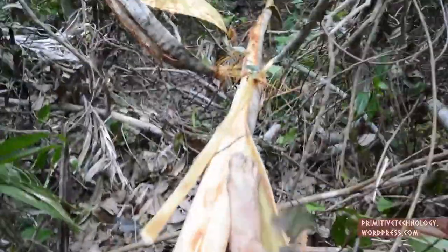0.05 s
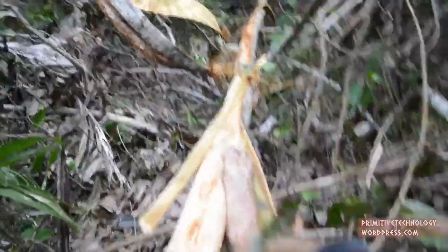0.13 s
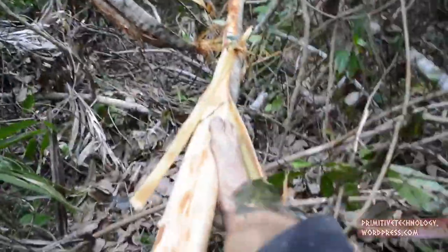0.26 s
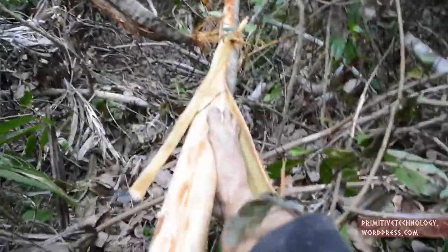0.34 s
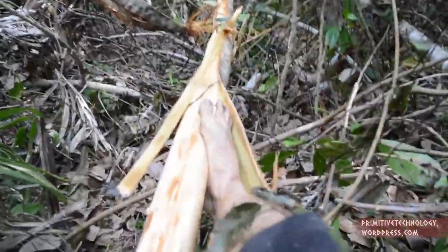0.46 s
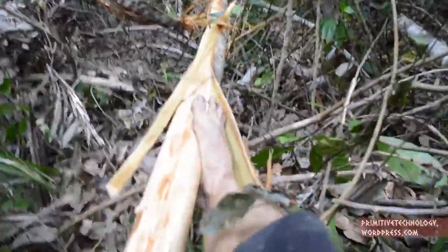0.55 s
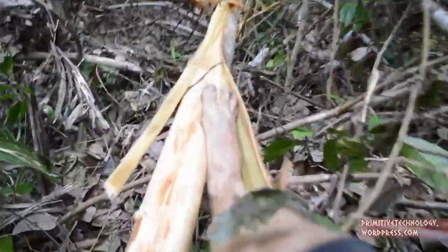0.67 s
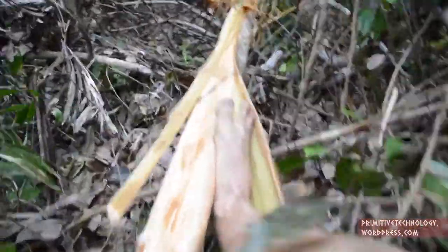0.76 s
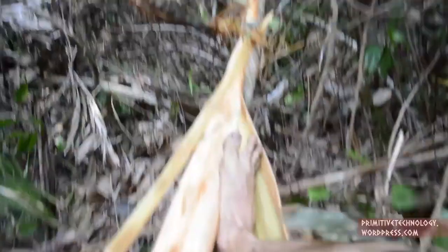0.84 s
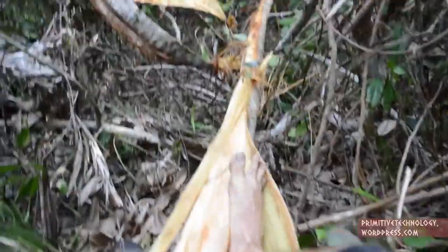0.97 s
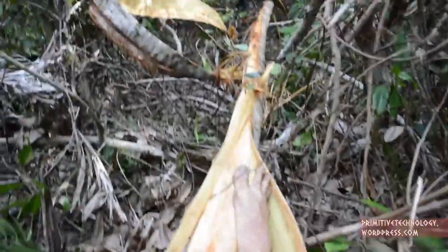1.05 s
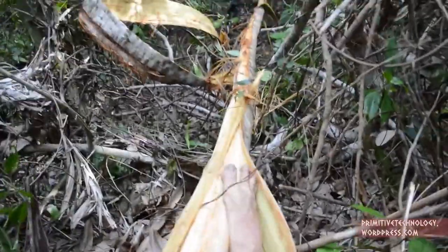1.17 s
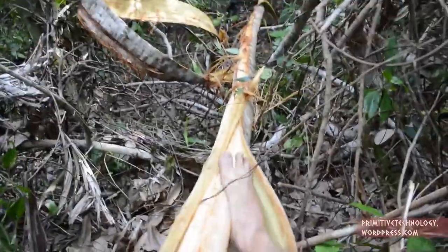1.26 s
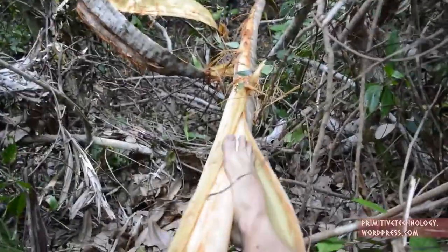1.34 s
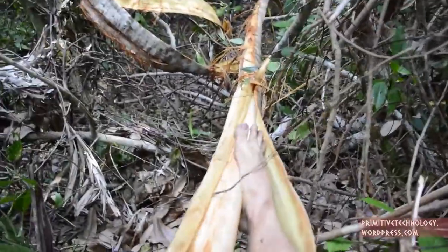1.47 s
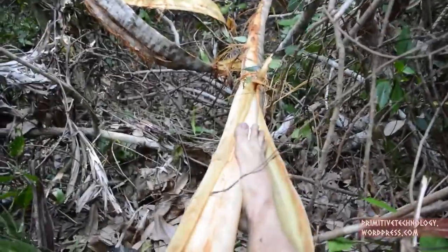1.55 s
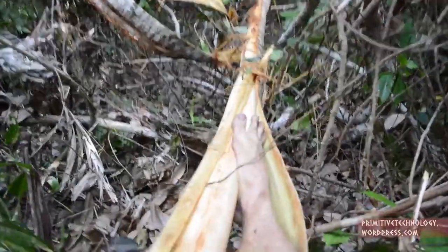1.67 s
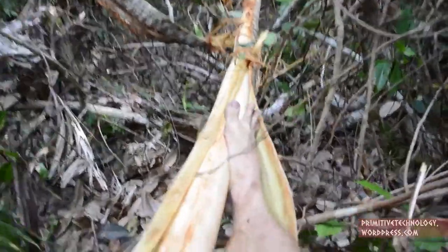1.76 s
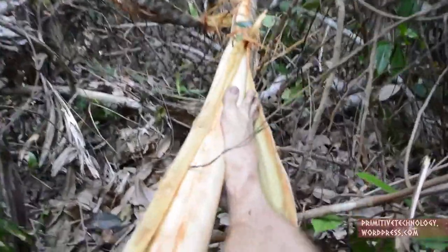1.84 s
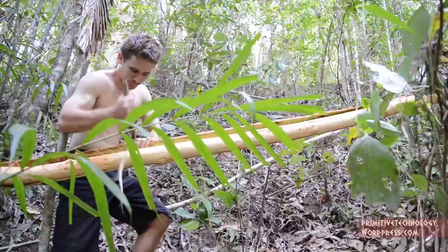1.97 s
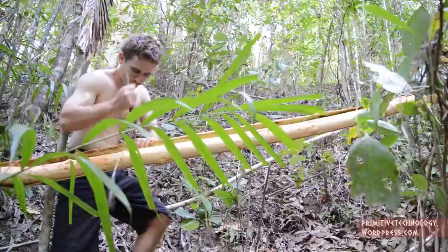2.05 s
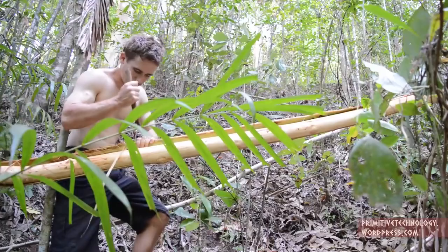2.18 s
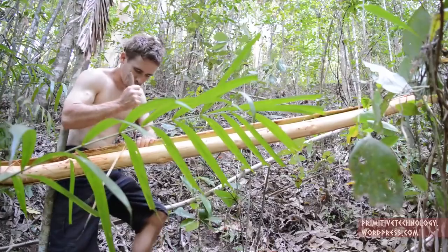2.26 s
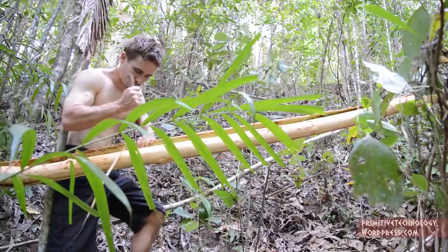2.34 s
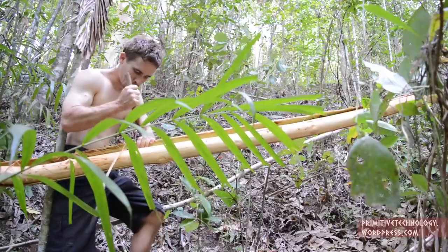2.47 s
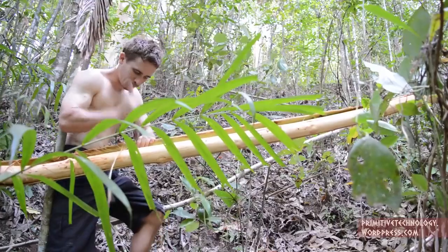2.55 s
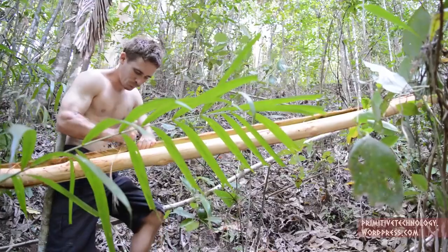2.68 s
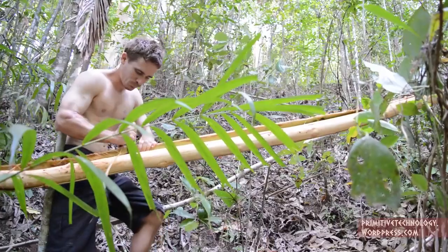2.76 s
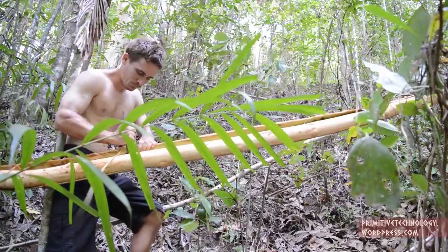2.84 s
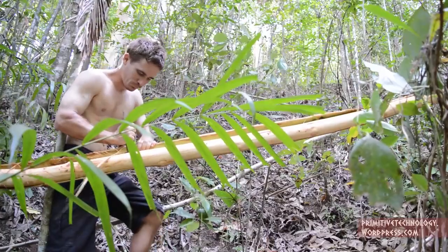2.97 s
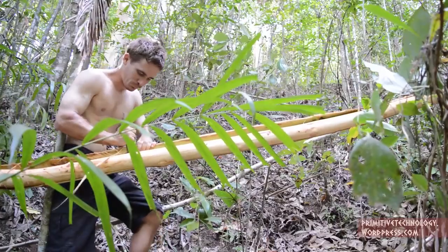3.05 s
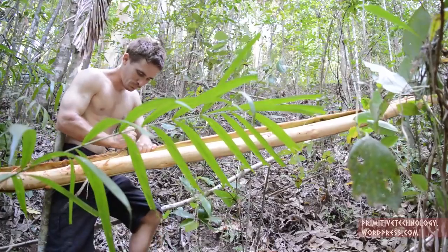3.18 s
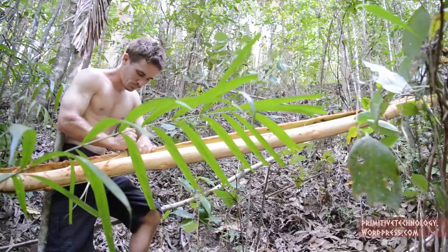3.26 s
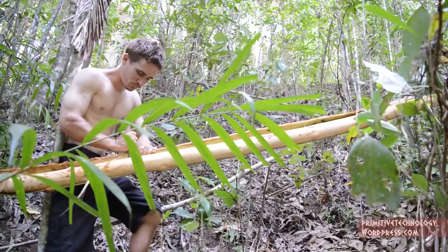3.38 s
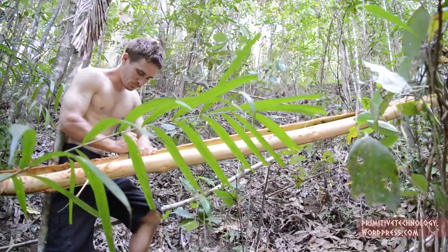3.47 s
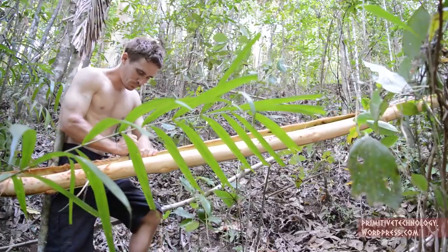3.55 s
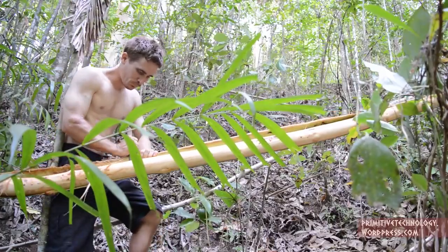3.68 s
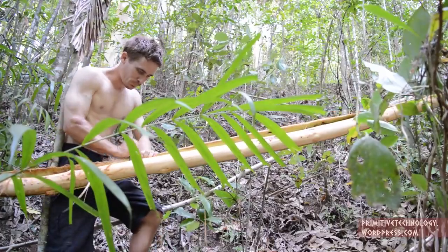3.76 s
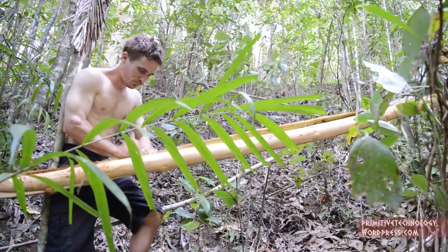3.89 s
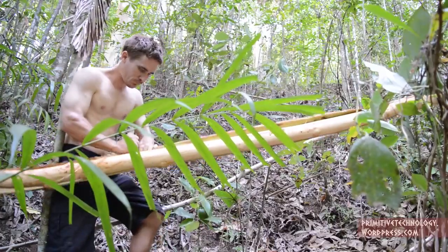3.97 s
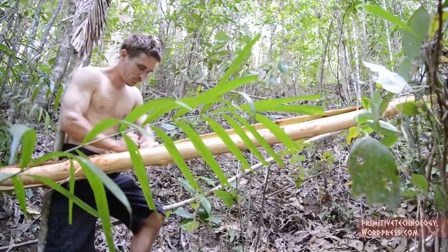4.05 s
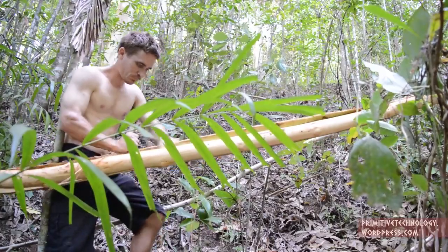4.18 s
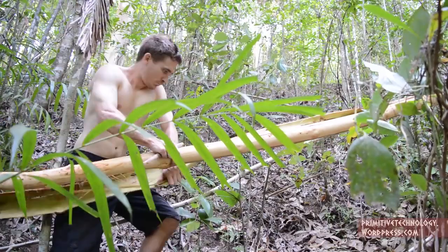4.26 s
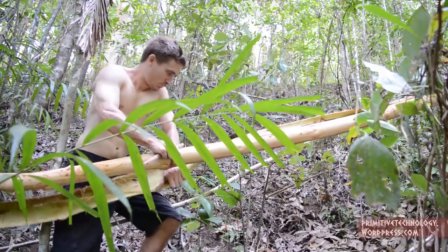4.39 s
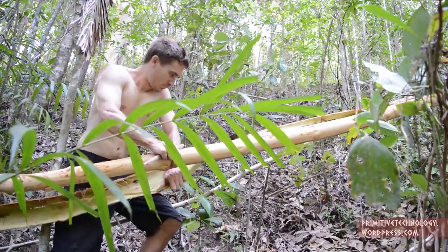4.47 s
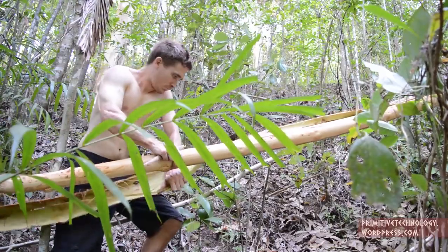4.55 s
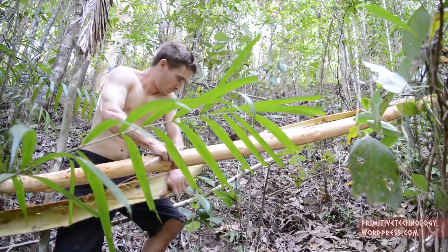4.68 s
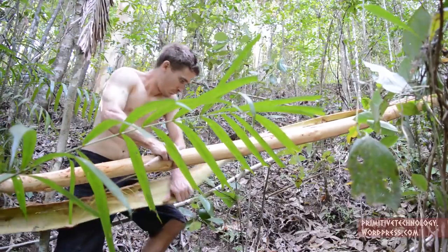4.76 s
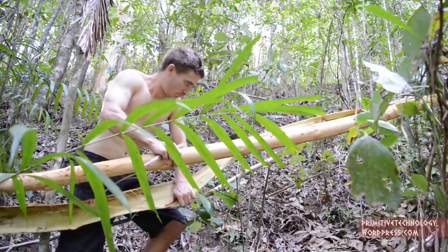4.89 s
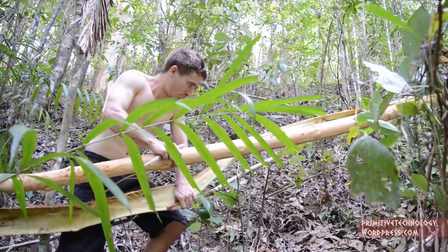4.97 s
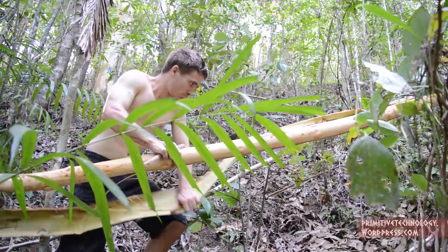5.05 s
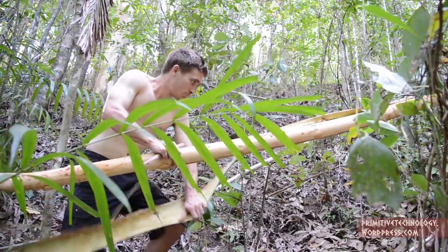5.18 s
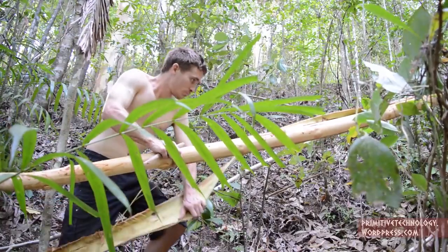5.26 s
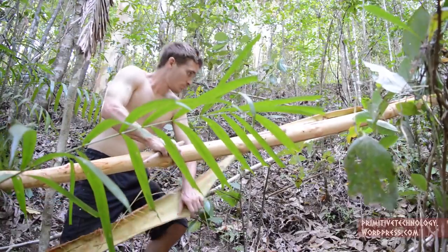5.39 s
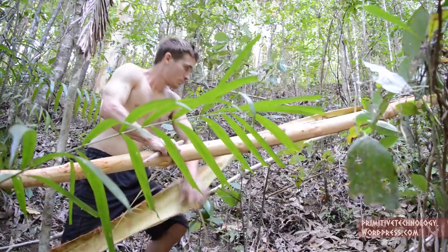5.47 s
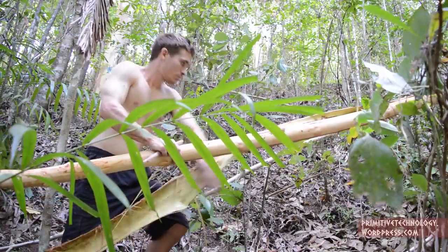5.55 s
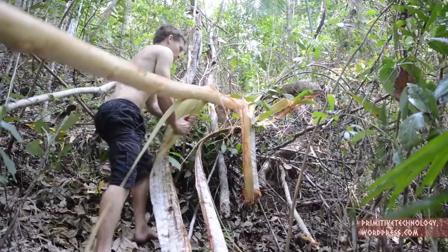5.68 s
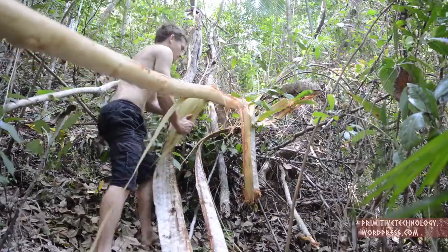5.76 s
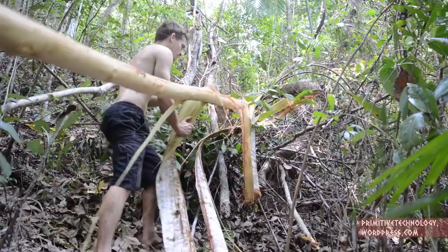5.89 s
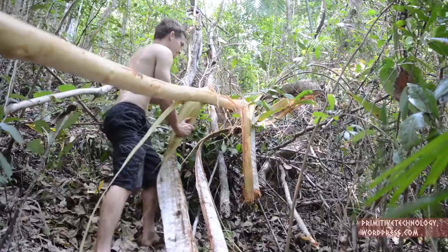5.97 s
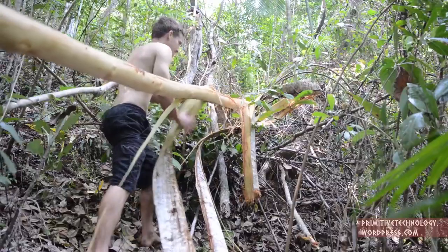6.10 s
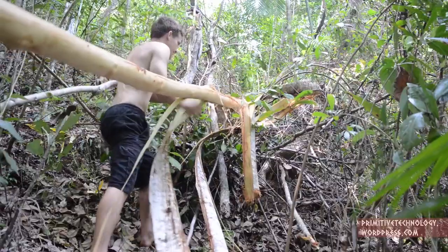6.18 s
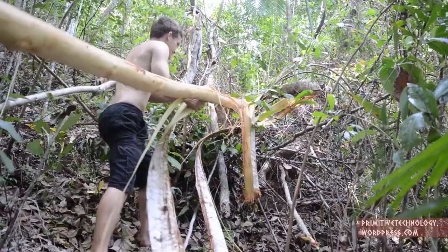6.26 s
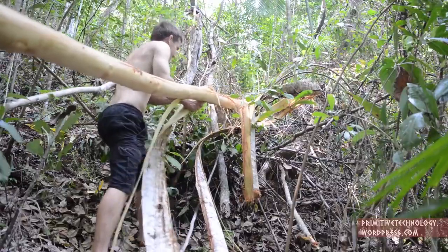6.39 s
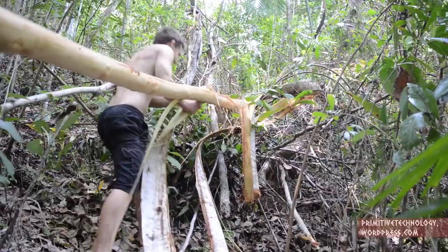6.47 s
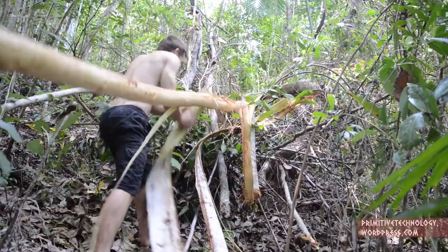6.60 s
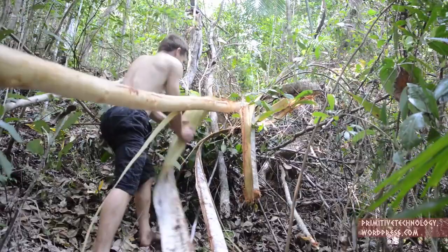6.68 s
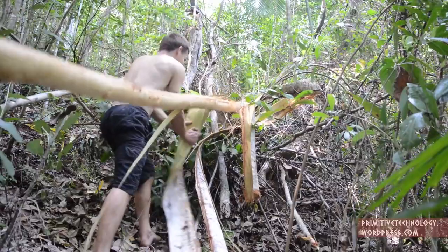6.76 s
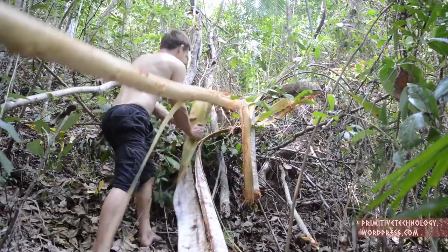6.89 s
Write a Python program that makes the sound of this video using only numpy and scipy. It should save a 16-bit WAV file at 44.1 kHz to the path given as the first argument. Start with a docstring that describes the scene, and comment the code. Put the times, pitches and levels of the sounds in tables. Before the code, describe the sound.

Fibrous bark is ripped off a trunk in crunchy, snapping bursts, loud and close first, then sparser picks, cracks and tearing pulls amid insect buzz.

```python
"""Fibrous bark is stripped from a fallen trunk in a forest. First it is levered off with a foot, then picked
and cracked loose by hand, then pulled away in a sheet, and at last ripped once more. All along, thousands of
random fibre breaks hiss and ring the bark sheet, and short bursts of breaks make snaps. Stiff bark cracks in the
first two stages, rings the trunk and overloads the microphone. Trees give a short echo over a faint wash of air;
filtered noise makes insects buzz, briefly near the start and then from the second stage to the end."""
import sys
import numpy as np
from scipy import signal
from scipy.fft import rfft, irfft
from scipy.io import wavfile
from scipy.ndimage import uniform_filter1d, map_coordinates

SR = 44100
rng = np.random.default_rng(int(sys.argv[2]) if len(sys.argv) > 2 else 0)


def file_out(sig):
    """Save sig as 16-bit WAV at sys.argv[1]."""
    # one column per channel
    cols = np.atleast_2d(sig).T
    # limit, then scale
    lim = np.clip(cols, -1, 1)
    pcm = np.round(lim * 32767).astype(np.int16)
    wavfile.write(sys.argv[1], SR, pcm)


N = 305613
TIME = np.arange(N) / SR  # seconds

# The four stages of the work: (start [s], end [s])
PEEL_S, PICK_S, PULL_S, RIP_S = (0, 2.075), (2.075, 4.31), (4.31, 5.735), (5.735, 7)

# Tone colour of the bark in each stage: (frequency [Hz], relative level [dB])
PEEL_COLOUR = [(47, -42), (80, -31), (182, -15.5), (441, -7), (672, -10.5), (917, -7), (1050, -9),
               (1670, -6), (2270, -7), (3620, -2.5), (9400, 5), (10500, 2), (16000, -21)]
PICK_COLOUR = [(150, -37), (600, -18.5), (900, -9), (1250, 0.5), (1800, -5), (2400, -3), (3200, -4.5),
               (5500, -2.5), (7500, -2), (10500, 3), (13000, -7.5), (16000, -24)]
PULL_COLOUR = [(100, -30), (300, -11), (780, -4), (1400, -5), (1800, -3), (2150, -8.5), (3300, -5.5),
               (6000, -5), (9600, -2.5), (11000, -3), (13000, -12.5), (16000, -26)]
RIP_COLOUR = [(88, -66), (150, -34), (376, -24), (439, -14.5), (702, -12.5), (923, -7.5), (998, -6.5),
              (1260, -6.5), (4490, -6), (9820, 2.5), (11900, -4), (16000, -24)]

# Tugs on the bark: (full force at [s], hold [s], build-up [s], dying away [s],
# fibre hiss before the stage's own gain [dB], sheet ring relative to the hiss, before that gain [dB])
TUGS = [(0, 0.0032, .01, 0.021, -14.5, -10), (0.054, 0.021, 0.045, 0.07, -30, -7),
        (0.461, 0.018, 0.059, 0.063, -30.5, -3.5), (0.569, 0.11, 0.063, 0.074, -24, -5),
        (0.798, 0.096, 0.06, 0.052, -28.5, -10.5), (0.964, 0.027, 0.058, 0.086, -15, -10.5),
        (1.18, 0.066, 0.05, .05, -24, -6), (1.349, .09, 0.052, 0.069, -19.5, -8),
        (1.525, .01, .03, .03, -34, -8), (1.644, 0.097, 0.12, 0.037, -26, -4.5),
        (1.853, 0.036, 0.11, .11, -27.5, -3), (2.069, 0.017, 0.065, 0.16, -31.5, 1),
        (2.106, .04, 0.088, 0.21, -37, -10.5), (2.723, 0.0095, 0.015, .013, -28, -20),
        (2.891, 0.011, 0.036, 0.023, -35.5, -6), (3, 0.13, 0.017, 0.18, -37, -10),
        (3.355, 0.0043, 0.016, .015, -31.5, -3.5), (3.394, 0.031, 0.014, 0.041, -30.5, -8),
        (3.593, 0.015, 0.035, 0.045, -35, -6.5), (3.682, 0.039, 0.049, 0.031, -32.5, -9),
        (3.865, 0.018, 0.023, 0.034, -17.5, -1), (4.345, .02, 0.011, .06, -38, -24),
        (4.45, 0.069, .025, .05, -34, -11.5), (4.612, 0.0082, .02, 0.018, -30, -20),
        (4.69, 0.088, 0.014, 0.045, -22.5, -21), (4.795, 0.03, 0.05, 0.057, -15.5, -12.5),
        (4.872, 0.013, .02, 0.013, -25.5, -13), (5.173, 0.016, 0.084, 0.052, -37, -8.5),
        (5.225, 0.065, 0.028, 0.041, -38.5, 3), (5.52, 0.046, 0.047, 0.09, -45, -3.5),
        (5.79, 0.065, .08, 0.21, -32.5, -8.5), (6.209, 0.25, .08, 0.049, -39, -6),
        (6.559, .02, .012, .02, -25, -9), (6.669, .1, 0.054, 0.026, -12, -7.5),
        (6.84, 0.034, .05, .15, -31, -5)]
TUG_SHAPE = 1.21  # 1 = exponential flanks, 2 = bell-shaped

# Large fibre bundles snapping: (time [s], level before the stage's own gain [dB], decay [s],
# sheet ring relative to the snap [dB], pitch of the freed splinter [Hz])
SNAPS = [(.0922, -17.5, 0.0047, -31, 9800), (.2108, -15.5, 0.0011, 1, 3970), (0.2483, -9, .0006, -10, 4000),
         (0.3017, -4.5, 0.00071, -9, 3830), (0.8205, -1, 0.00052, -16, 9900),
         (0.827, -16, 0.0022, 0.5, 5660), (0.845, -14, .004, -24, 7050), (.869, -13.5, 0.0044, -12, 9000),
         (.8985, -6, .0006, -23, 8950), (.955, -5, .0008, -26, 9000), (.962, -9, 0.0034, -20, 6000),
         (0.9822, -6.5, 0.0023, -17, 5600), (1.0274, -8, .00085, -9, 8000), (0.9949, -3, 0.00099, -3, 9300),
         (1.0692, -12, 0.0028, -6, 5300), (1.1305, -1, 0.00053, -12, 10100),
         (1.2178, -11.5, 0.0032, -6.5, 1680), (1.2426, -6.5, 0.00048, -23, 9200),
         (1.4343, -6, .0006, -21, 8100), (1.522, -12, 0.001, -9, 4200), (1.3952, 0, 0.0016, -7, 5550),
         (1.4145, -7, 0.0016, -12, 7700), (1.444, -8, 0.0042, -9, 7050), (1.5599, -5, 0.0013, -8, 7400),
         (1.5834, -13.5, 0.002, -15, 7300), (1.8875, -18.5, .004, -4, 4960), (1.966, -9, 0.0012, -10, 7500),
         (2.068, -22, 0.0027, -2, 9200), (2.114, -20, 0.00069, -22, 9300),
         (2.3178, -24.5, 0.00072, -18.5, 9800), (2.8911, -24, 0.0065, -8.5, 2240),
         (3.0018, -22, 0.0054, -2, 7300), (3.084, -25, .0016, -4.5, 2650), (3.105, -19, .0011, 0.5, 3620),
         (3.1324, -24, .0023, -3, 5550), (3.1607, -24.5, 0.0044, -6, 8250),
         (3.205, -23.5, 0.0015, -6, 2620), (3.2313, -28, .0006, -2, 2600),
         (3.252, -22.5, .0011, -6.5, 6800), (3.286, -25, 0.0046, -4.5, 8160),
         (3.343, -23, 0.0015, -2, 3170), (3.3947, -26, 0.0042, -3, 2600), (3.6747, -22.5, .003, -.5, 10100),
         (3.725, -27.5, 0.0032, -7.5, 2040), (3.9214, -18.5, 0.0022, -4, 3320),
         (3.9625, -22.5, .0014, -1, 6800), (4.328, -14, 0.0037, -19.5, 11100),
         (4.3653, -18, 0.0054, -19, 10200), (4.466, -21, 0.0036, -15, 8200),
         (4.5, -20.5, 0.0074, -17, 8000), (4.536, -14.5, 0.0055, -20, 4700), (4.68, -20.5, .007, -17, 3400),
         (4.7806, -13, 0.0073, -9, 4140), (4.798, -12, 0.0026, -3, 8700), (5.145, -23.5, 0.0025, -14, 8300),
         (5.2033, -15, 0.00068, -17, 9200), (5.2498, -19.5, 0.0029, -2, 2040),
         (5.409, -28, 0.0053, -29, 10200), (6.3266, -17, 0.00057, -13, 8900),
         (6.5154, -26, 0.0031, -2.5, 2430), (6.534, -21, .0033, -24, 10700), (6.7844, -11, 0.001, -7, 8650)]

# Small snaps: level is relative to the hiss of the moment, before the stage's own snap gain
SMALL_SNAPS_PER_S, SMALL_SNAP_DB, SMALL_SNAP_SPREAD_DB = 45, 3, 2.5
SMALL_SNAP_DECAY_S, SMALL_SNAP_HZ = 0.0012, 6000  # typical; each is within an octave of these

# Stiff bark cracking through: (time [s], level before the overall crack gain [dB], decay [s],
# blow to the trunk relative to the crack, before the trunk gain [dB])
CRACKS = [(1.4598, -2.5, 0.0052, 1.5), (1.4742, -3.5, 0.0063, 3), (2.6886, -17, 0.0037, -12),
          (2.6914, -2.5, 0.0058, -25), (2.699, -5.5, 0.0036, -31), (3.831, 10.5, 0.0019, -3.5),
          (3.8573, -5, 0.0038, 0.5), (3.867, -7, .0018, 1), (3.872, -4.5, .0018, 9), (3.880, -6, .0025, 3)]
# Tone colour of the cracks: (frequency [Hz], relative level [dB])
CRACK_COLOUR = [(71, -28), (120, -28.5), (698, -7.5), (911, -4), (1320, 1.5), (2870, -4.5), (3310, -1.5),
                (7350, -5.5), (9990, 0.5), (11800, -11.5), (15000, -14), (16000, -53)]
# Ringing tones of the trunk with its loose bark: (pitch [Hz], width [Hz], relative peak level [dB])
TRUNK_MODES = [(340, 58, -8.5), (485, 160, -4.5), (703, 66, 0.5), (756, 77, -2), (1203, 84, 4),
               (1320, 130, 0.5), (1407, 110, 0.5), (1574, 100, 3), (1700, 110, -3), (1790, 85, -11.5),
               (2470, 300, -19), (3800, 86, -36)]

# Low bumps, dull thumps, some underfoot and some as weight beneath the cracks:
# (time [s], level before doubling [dB], pitch [Hz], decay [s])
LOW_BUMPS = [(0.044, -42, 42, 0.046), (.059, -38.5, 129, 0.015), (0.213, -28.5, 232, 0.0026),
             (.819, -38, 118, 0.01), (1.947, -40.5, 116, 0.012), (2.689, -24, 600, .005),
             (3.832, -35, 55, 0.0082), (3.86, -31, 102, 0.0092), (5.218, -38, 430, 0.0072),
             (5.25, -43, 347, 0.0056), (5.3, -40.5, 460, .005), (6.314, -46, 446, 0.0066),
             (6.46, -46.5, 403, 0.0046)]
# Insects: (start [s], end [s], pitch [Hz], width [Hz], average level [dB])
INSECTS = [(.24, 0.38, 14000, 350, -53), (2.1, 6.9, 6460, 230, -58.5), (3.95, 4.4, 8700, 900, -56),
           (4.322, 5.74, 8470, 1040, -37), (5.74, 7.8, 8600, 2660, -48.5)]
# Tone colour of still forest air: (frequency [Hz], relative level [dB])
FOREST_COLOUR = [(30, -23), (55, 1.5), (110, -2.5), (250, -4), (500, -6.5), (1000, -8.5), (2500, -13),
                 (5500, -15), (9500, -7.5), (12000, -18), (16000, -24)]
FOREST_DB = -49.5
TOP_HZ = 16000  # nothing much is heard above this


def tear(stage, colour, rate, scatter_db, jerk_db, wander_db, hiss_db, ring_db, snap_db,
         rest_db, rest_ring_db, split_hz=3000):
    """The tear front jerks; each break ticks there and shakes the loose sheet, with a faint rustle at rest."""
    start, end = stage
    hiss, ring = effort(start, end)
    hiss = np.hypot(hiss * undb(hiss_db), undb(rest_db))
    ring = np.hypot(ring * undb(ring_db), undb(rest_ring_db))

    jerks = undb(jerk_db * walk(130))
    jerks = jerks / np.sqrt(np.mean(jerks ** 2))
    breaks = wander(fibres(rate, scatter_db), wander_db) * jerks
    breaks = breaks * (TIME >= start) * (TIME < end)
    front, sheet = breaks * hiss, breaks * ring

    for at, db, decay_s, sheet_db, hz in SNAPS + small_snaps(start, end, hiss, ring):
        if start <= at < end:
            snap = splinter(bundle(decay_s), hz) * undb(db + snap_db)
            add(front, at, snap)
            add(sheet, at, snap * undb(sheet_db))

    # the narrow front gives off the treble, the broad sheet the body
    bark = response(colour)
    treble = through(front, unit(steep(bark, split_hz, "high")))
    body = through(sheet, unit(steep(bark, split_hz, "low")))
    return treble + body


def effort(start, end):
    """Each tug builds up, holds and dies away; gives the gains of tear front and sheet through one stage."""
    front_power, sheet_power = np.zeros(N), np.zeros(N)
    for at, hold_s, build_s, fade_s, db, ring_db in TUGS:
        if start <= at < end:
            before = np.maximum(at - TIME, 0) / build_s
            after = np.maximum(TIME - at - hold_s, 0) / fade_s
            away = np.minimum(before + after, 20)
            power = undb(db) ** 2 * np.exp(-2 * away ** TUG_SHAPE)
            front_power += power
            sheet_power += power * undb(ring_db) ** 2
    return np.sqrt(front_power), np.sqrt(sheet_power)


def fibres(rate, scatter_db):
    """Single fibres break at random, rate times a second: many small, a few large; average strength (rms) 1."""
    breaks = rng.random(N) < rate / SR
    size = undb(scatter_db * np.minimum(rng.exponential(size=N), 4.5))
    direction = rng.choice([-1, 1], N)
    return unit(breaks * size * direction) * np.sqrt(N)


def wander(x, db, size=256, patch_s=.018, patch_hz=600):
    """The loose strip keeps bending, so its resonances come and go; higher ones are wider."""
    hz, s, spectrum = signal.stft(x, SR, nperseg=size)
    # four patches lie between 0 and patch_hz, and they widen with pitch
    where = np.meshgrid(np.sqrt(hz / patch_hz) * 4, s / patch_s, indexing="ij")
    field = map_coordinates(rng.standard_normal((90, 720)), where, order=1)
    gain = undb(db * field)
    gain = gain / np.sqrt(np.mean(gain ** 2))
    return signal.istft(spectrum * gain, SR, nperseg=size)[1][:N]


def small_snaps(start, end, hiss, ring):
    """Thin bundles snap at random, as hard as the bark is being pulled; rows like those of SNAPS."""
    rows = []
    for wait, size, length, sheet, pitch in rng.random((200, 5)):
        start += -np.log(1 - wait) / SMALL_SNAPS_PER_S
        i = int(start * SR)
        if start >= end or i >= N:
            break
        db = 20 * np.log10(hiss[i]) + SMALL_SNAP_DB + SMALL_SNAP_SPREAD_DB * (2 * size - 1)
        sheet_db = 20 * np.log10(ring[i] / hiss[i]) + SMALL_SNAP_SPREAD_DB * (2 * sheet - 1)
        decay_s = SMALL_SNAP_DECAY_S * 2 ** (2 * length - 1)
        hz = SMALL_SNAP_HZ * 2 ** (2 * pitch - 1)
        rows.append((start, db, decay_s, sheet_db, hz))
    return rows


def bundle(decay_s, rise=0.28, scatter_db=6, size=2048):
    """A bundle gives way: an avalanche of breaks builds up and dies out; rms near 1 at its top."""
    age = np.arange(size) / SR / decay_s  # counted in decay times, as is rise
    direction = rng.choice([-1, 1], size)
    breaks = direction * undb(scatter_db * np.clip(rng.standard_normal(size), -2, 2))
    swell = np.exp(-age) * (1 - np.exp(-age / rise))
    return unit(breaks * swell) * np.sqrt(decay_s * SR / 2)


def splinter(snap, hz, share=0.17, quality=6):
    """A ringing filter adds the freed splinter's brief tone to a snap, keeping the snap's total energy."""
    ring = signal.lfilter(*signal.iirpeak(hz, quality, fs=SR), snap)
    mixed = np.sqrt(1 - share) * unit(snap) + np.sqrt(share) * unit(ring)
    return unit(mixed) * np.linalg.norm(snap)


def cracks(crack_db=-1.0, trunk_db=-4.5, size=4096):
    """Stiff bark breaks in quick volleys that ring the fading tones of the trunk."""
    burst, blow = np.zeros(N), np.zeros(N)
    for at, db, decay_s, ring_db in CRACKS:
        crack = bundle(decay_s, rise=0.37, scatter_db=3) * undb(db)
        add(burst, at, crack)
        add(blow, at, crack * undb(ring_db))

    t = np.arange(size) / SR
    wood = np.zeros(size)
    for hz, width, db in TRUNK_MODES:
        # a wider mode dies away sooner
        fade = width * np.exp(-np.pi * width * t)
        wood += undb(db) * fade * np.cos(2 * np.pi * hz * t)
    bark = undb(crack_db) * through(burst, response(CRACK_COLOUR))
    trunk = undb(trunk_db) * through(blow, unit(wood))
    return bark + trunk


def low_bumps():
    """Dull thumps, some underfoot and some as weight beneath the cracks: sine waves that die away quickly."""
    out, t = np.zeros(N), np.arange(SR // 2) / SR
    for at, db, hz, decay_s in LOW_BUMPS:
        add(out, at, 2 * undb(db) * np.sin(2 * np.pi * hz * t) * np.exp(-t / decay_s))
    return out


def trees(x, near_db=-13, near_t60=0.13, far_db=-23, far_t60=0.67, far_hz=8000):
    """Litter and nearby stems scatter sound at once; farther trunks return a duller tail (t60: s to -60 dB)."""
    t = np.arange(SR) / SR
    near = rng.standard_normal(SR) * undb(-60 * t / near_t60) * (t > .003)
    far = rng.standard_normal(SR) * undb(-60 * t / far_t60) * (t > .015)
    far = signal.sosfilt(signal.butter(1, [1400, far_hz], "band", fs=SR, output="sos"), far)
    return through(x, undb(near_db) * unit(near) + undb(far_db) * unit(far))


def insects():
    """Each insect is a narrow, fluttering band of buzz, cut from noise by a resonance."""
    out, grid = np.zeros(N), np.fft.rfftfreq(N, 1 / SR)
    for start, end, hz, width_hz, db in INSECTS:
        resonance = 1 / (1 + ((grid - hz) / width_hz * 2) ** 2)
        buzz = irfft(rfft(rng.standard_normal(N)) * resonance, N)
        buzz = unit(buzz) * np.sqrt(N)
        # averaging softens the on and off edges
        singing = uniform_filter1d(1. * ((TIME > start) & (TIME < end)), size=600)
        out += buzz * singing * undb(db + 0.55 * walk(55))
    return out


def forest():
    """Faint wash of air in the leaves: coloured noise whose level drifts slightly."""
    air = through(rng.standard_normal(N), response(FOREST_COLOUR))
    return air * undb(FOREST_DB + 0.38 * walk(4.5))


def undb(db):
    """Turn decibels into gain."""
    return 10 ** (np.asarray(db) / 20)


def unit(h):
    """Scale a sound or response to energy 1."""
    return h / np.sqrt(np.sum(h ** 2) + 1e-18)


def through(x, h):
    """Pass a sound through a response."""
    return signal.fftconvolve(x, h)[:N]


def add(track, s, sound):
    """Mix a sound into a track at time s, in seconds."""
    i = int(s * SR)
    track[i:i + len(sound)] += sound[:N - i]


def response(colour, size=2048):
    """Make a response of energy 1 with the given colour, reacting only after it is struck (minimum phase)."""
    hz, db = np.transpose(colour)
    grid = np.maximum(np.fft.rfftfreq(size, 1 / SR), 1)
    gain = undb(np.interp(np.log(grid), np.log(hz), db))
    # folding the cepstrum moves the energy to the start
    cepstrum = irfft(np.log(gain))
    cepstrum[1:size // 2] *= 2
    cepstrum[size // 2 + 1:] = 0
    return unit(irfft(np.exp(rfft(cepstrum))))


def steep(x, hz, kind):
    """Apply a second-order filter twice."""
    sos = signal.butter(2, hz, kind, fs=SR, output="sos")
    return signal.sosfilt(sos, signal.sosfilt(sos, x))


def walk(rate):
    """Smooth random wavering with spread 1, heading for a new value about rate times a second."""
    k = int(SR / rate)
    steps = np.repeat(rng.standard_normal(N // k + 1), k)
    smooth = uniform_filter1d(steps, k)[:N]
    return smooth / smooth.std()


def scene(close_db=-8, crack_echo_db=-4):
    """The four tears and the cracks among the trees; the peeling underfoot is close, with less echo."""
    peel = tear(PEEL_S, PEEL_COLOUR, rate=7000, scatter_db=3.0, jerk_db=1.55, wander_db=2.5,
                hiss_db=-.4, ring_db=-0.13, snap_db=-0.8, rest_db=-40, rest_ring_db=-46)
    pick = tear(PICK_S, PICK_COLOUR, rate=4000, scatter_db=4.0, jerk_db=3.5, wander_db=2.5,
                hiss_db=0.4, ring_db=-6, snap_db=0.5, rest_db=-59, rest_ring_db=-63.5)
    pull = tear(PULL_S, PULL_COLOUR, rate=14000, scatter_db=3.0, jerk_db=2.0, wander_db=2.5,
                hiss_db=-3.0, ring_db=-6.5, snap_db=-1.9, rest_db=-53.5, rest_ring_db=-69)
    rip = tear(RIP_S, RIP_COLOUR, rate=14000, scatter_db=3.0, jerk_db=1.66, wander_db=3.0,
               hiss_db=-3, ring_db=-5.5, snap_db=0.9, rest_db=-45.5, rest_ring_db=-55)
    crack = cracks()
    echo = trees(undb(close_db) * peel + pick + pull + rip + undb(crack_echo_db) * crack)
    bark = peel + pick + pull + rip + crack
    return (bark + echo + low_bumps() + insects() + forest())[None]


def record(dry):
    """The microphone rounds off the loudest peaks just below full scale; the top of the treble is cut."""
    rounded = dry / (1 + (dry / .95) ** 8) ** (1 / 8)
    top_cut = signal.ellip(10, .2, 85, TOP_HZ, fs=SR, output="sos")
    return signal.sosfilt(top_cut, rounded)


dry = scene()
out = record(dry)
file_out(out)
```